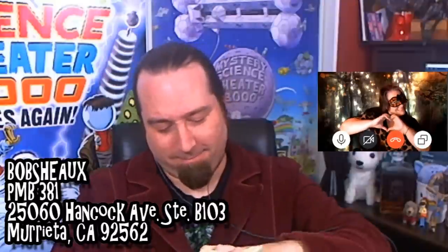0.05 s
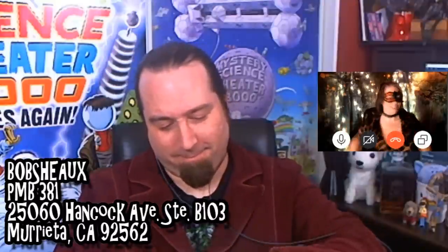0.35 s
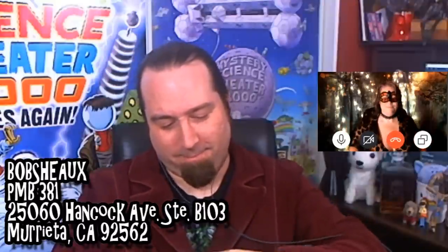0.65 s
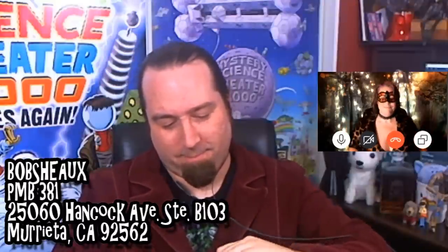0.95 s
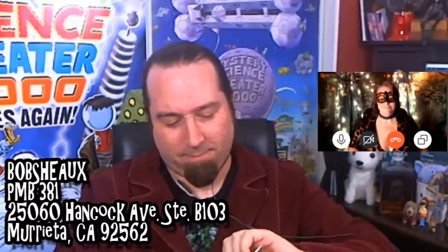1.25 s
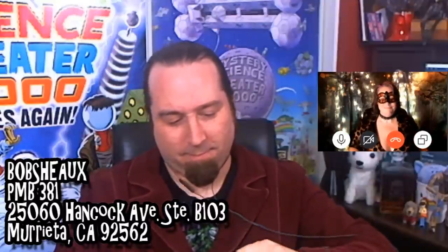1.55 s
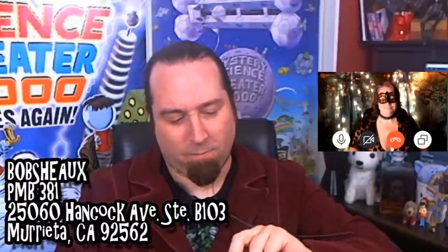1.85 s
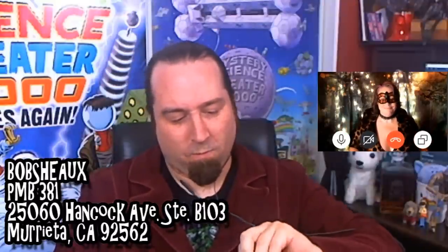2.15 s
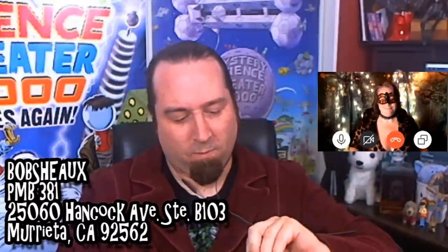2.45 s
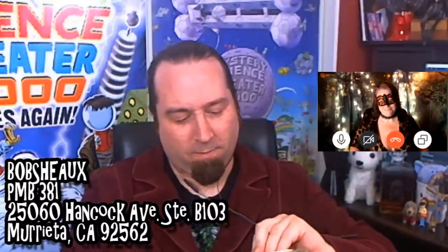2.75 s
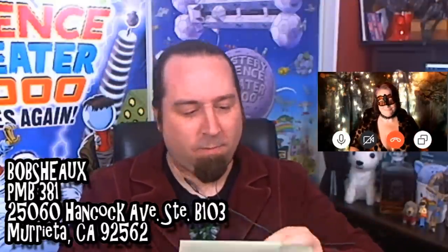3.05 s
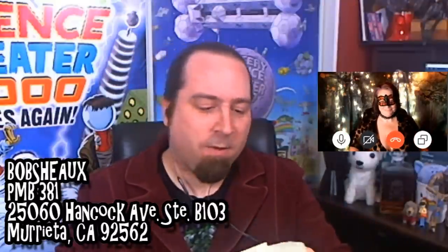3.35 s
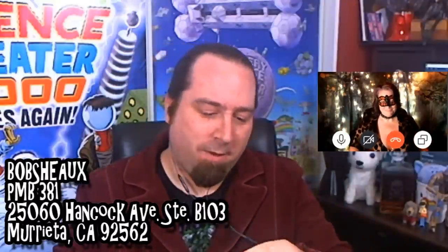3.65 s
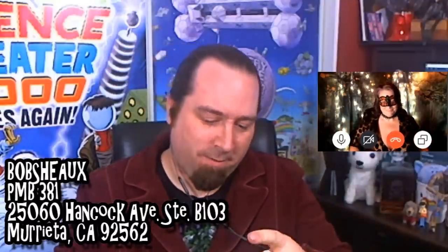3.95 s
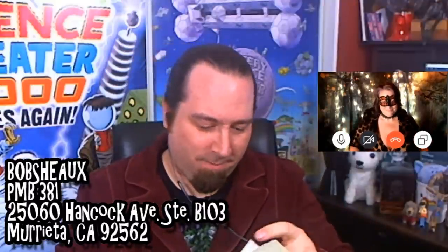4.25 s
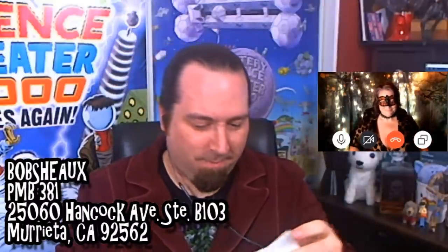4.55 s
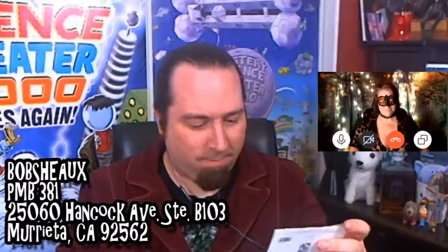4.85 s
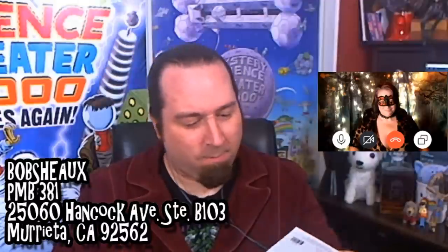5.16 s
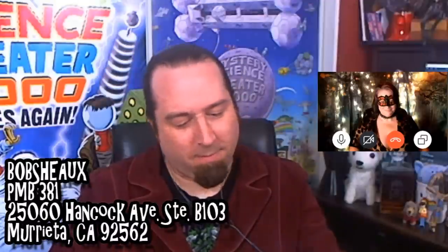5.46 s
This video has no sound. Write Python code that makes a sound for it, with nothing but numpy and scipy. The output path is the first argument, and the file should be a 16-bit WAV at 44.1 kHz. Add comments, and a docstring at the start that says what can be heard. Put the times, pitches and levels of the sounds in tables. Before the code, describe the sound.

A stiff paper envelope is handled close to the microphone in a small, dry room with a faint low rumble. In the first second, fingers stroke and push the paper, and its creases snap sharply at about 0.2 and 0.8 seconds. Just after 1 second the flap rips in a few short, hissing pulls, followed by a soft, dull bump on the desk. After a lull, another brief tear comes near 2.1 seconds. From about 2.7 seconds the paper crinkles and snaps in irregular bursts, with a quick rip around 3.5 seconds. From roughly 3 seconds a distant motor fades in very faintly and slowly speeds up. At about 4.5 seconds a sheet slides out with a hiss and a cluster of crisp snaps. A few light finger strokes and small ticks follow until the end, at around 5.7 seconds.

```python
"""A paper envelope is opened by hand at a desk, close up, in a small, dry room with a faint rumble.
First the fingers stroke and push the stiff paper, and its creases buckle in sharp snaps.
After a second the flap rips in short, hissing pulls; now and then the envelope bumps dully on the desk.
From about three seconds a distant motor drones in faintly and slowly speeds up.
Near the end a sheet slides out with more snaps, and a few light strokes follow."""
import sys
import numpy as np
from scipy import signal
from scipy.fft import rfft, irfft, next_fast_len
from scipy.io import wavfile
from scipy.ndimage import uniform_filter1d, map_coordinates

SR = 44100
rng = np.random.default_rng(int(sys.argv[2]) if len(sys.argv) > 2 else 0)


def master_out(mix):
    """Clip the mix to full scale and print it as 16-bit PCM to the path in sys.argv[1]."""
    frames = np.transpose(np.atleast_2d(mix))
    ceiling = np.clip(frames, -1, 1)
    pcm = np.round(ceiling * 32767).astype(np.int16)
    wavfile.write(sys.argv[1], SR, pcm)


N = 250929

# room tone, deep rumble to faint hiss: freq_hz, gain_db
ROOM_TONE_EQ = [(3, -13), (12, 0.5), (30, -24), (65, -20.5), (125, -20.5), (200, -23), (400, -29),
                (850, -30), (1500, -42), (3000, -43), (16000, -51)]
# how long the room rings: freq_hz, t60_s
ROOM_DECAY = [(150, .3), (500, 0.17), (2000, 0.13), (7000, 0.14), (11000, 0.087), (16000, 0.26)]
# the distant motor fades in and speeds up: time_s, firing_hz, level_db
MOTOR_RUN = [(2.7, 37, -82), (3.8, 39.3, -64), (4.85, 40, -60), (5.35, 41.1, -61), (5.69, 42, -61)]
# overtones of its firing rate: multiple, gain_db
MOTOR_OVERTONES = [(3, -8), (5, -6), (6, -2), (7, -7), (8, -3), (9, -1), (10, -4), (11, 2), (12, -4),
                   (13, -3), (16, -5)]
# the dull wash around them: freq_hz, gain_db
MOTOR_WASH_EQ = [(40, -11), (100, -7.5), (420, 4.5), (700, 4), (1500, -33), (5000, -34)]
# finger strokes over the paper: start_s, length_s, flex_db, hiss_db
STROKES = [(0, .006, -41.5, -51), (0.08, 0.072, -61.5, -63.5), (0.245, 0.14, -43, -48.5),
           (0.44, .11, -45.5, -52), (0.61, 0.036, -46.5, -48.5), (0.665, .035, -39, -42),
           (0.742, 0.062, -31.5, -38.5), (0.88, 0.053, -38, -39), (0.96, 0.055, -53.5, -55.5),
           (1.29, 0.1, -59.5, -55), (1.68, .03, -60, -62), (1.74, 0.12, -54.5, -59),
           (1.88, .045, -46.5, -50.5), (2.02, .04, -50, -55.5), (2.075, 0.027, -46, -44),
           (2.68, 0.0605, -55, -62), (2.865, 0.053, -53, -55.5), (2.93, .08, -44, -50.5),
           (3.135, 0.066, -53, -54), (3.27, .11, -48.5, -47), (3.435, 0.053, -44, -43.5),
           (3.65, 0.11, -54, -53), (3.78, 0.049, -53, -62.5), (3.89, 0.073, -62, -57.5),
           (3.965, .12, -54, -57), (4.25, 0.071, -51, -56.5), (4.4, .05, -54.5, -59),
           (4.485, .025, -43, -43), (4.68, 0.07, -46.5, -48), (4.79, 0.096, -53.5, -46),
           (4.94, 0.084, -70.5, -68), (5.1, 0.0072, -54.5, -45), (5.185, .05, -50, -48.5),
           (5.27, 0.067, -60, -58), (5.35, .11, -61.5, -52.5), (5.49, 0.066, -65, -65)]
# short pulls that rip the flap or slide the sheet: start_s, length_s, flex_db, hiss_db
PULLS = [(1.075, 0.034, -30, -35), (1.098, 0.046, -31.5, -28), (1.168, 0.024, -32, -27.5),
         (1.21, .015, -41, -36), (1.243, 0.016, -37, -34.5), (2.108, 0.03, -41.5, -37),
         (2.141, 0.011, -30.5, -37.5), (3.527, 0.022, -32, -30.5), (3.565, 0.023, -27, -38.5),
         (4.505, 0.059, -33.5, -35), (4.555, .06, -35, -30.5), (4.63, 0.034, -26.5, -43)]
# sharp paper snaps and a few dull bumps of the envelope on the desk:
# start_s, level_db, treble_corner_hz, decay_s (to fall 30 dB)
SNAPS_AND_BUMPS = [(0.171, -51, 1990, 0.024), (0.194, -31.5, 1600, 0.04), (0.2096, -17.5, 8300, .031),
                   (0.2756, -30, 1800, .035), (0.2922, -28.5, 1890, 0.038), (0.363, -46, 6100, 0.0054),
                   (0.416, -27.5, 3100, 0.02), (0.483, -36.5, 1967, 0.024), (0.502, -36, 1290, 0.022),
                   (0.52, -42, 13940, 0.011), (0.759, -16, 14000, .029), (0.77, -23.5, 11070, .053),
                   (0.787, -21, 7820, 0.015), (1.042, -42.5, 14200, 0.0094), (1.0492, -37.5, 5900, .014),
                   (1.0696, -30.5, 10000, .018), (1.258, -37, 614, 0.017), (1.287, -40.5, 900, 0.03),
                   (1.3552, -34, 1890, .02), (1.448, -52.5, 16000, .012), (1.609, -61.5, 6000, .013),
                   (1.891, -42, 7050, 0.046), (1.944, -48.5, 12000, 0.0059), (2.114, -32.5, 14800, 0.024),
                   (2.141, -30, 12040, .03), (2.316, -49.5, 11100, 0.017), (2.376, -57, 1810, 0.012),
                   (2.562, -57, 16000, 0.011), (2.608, -54.5, 16000, 0.011), (2.6596, -30.5, 3750, 0.02),
                   (2.6753, -21.5, 4730, .017), (2.775, -41.5, 8700, .011), (2.887, -42.5, 2900, 0.015),
                   (2.9118, -29.5, 4070, 0.014), (2.96, -24, 2700, 0.027), (3.039, -31, 1590, .036),
                   (3.073, -31.5, 1830, 0.024), (3.194, -40, 1900, 0.021), (3.2835, -28, 1900, 0.0068),
                   (3.2916, -27, 1830, 0.014), (3.304, -27, 16000, 0.004), (3.3039, -18, 2900, .014),
                   (3.44, -31.5, 11840, 0.0041), (3.4495, -27, 11000, 0.0037), (3.464, -43, 16150, 0.0083),
                   (3.534, -25.5, 16060, 0.012), (3.575, -23.5, 2300, 0.024), (3.588, -21.5, 2000, 0.024),
                   (3.63, -35, 2320, 0.036), (3.671, -35, 2780, 0.0187), (3.728, -39.5, 1670, 0.02),
                   (3.873, -49.5, 3000, 0.025), (3.946, -46, 3000, 0.034), (4.188, -43, 790, 0.042),
                   (4.272, -28.5, 1980, 0.0068), (4.278, -27.5, 4600, 0.057), (4.352, -50, 3000, .006),
                   (4.488, -33, 1700, 0.022), (4.621, -25, 987, 0.011), (4.624, -17, 3560, 0.022),
                   (4.64, -20.5, 2440, 0.038), (4.656, -22, 2550, 0.019), (5.006, -53.5, 16000, .007),
                   (5.091, -37, 15950, .008), (5.225, -43.5, 4950, 0.011)]
# hiss of skin on paper: freq_hz, gain_db
SKIN_EQ = [(500, -30.5), (1600, -20.5), (2300, 2.5), (3700, 4), (5500, 5.5), (7700, 3), (10000, -5),
           (12500, -2.5), (16000, -12.5)]
# body of the flexing sheet: freq_hz, gain_db
SHEET_EQ = [(40, -14), (180, -11), (400, -2), (590, -9), (780, 1), (970, -3.5), (1400, 1.5), (2000, -4.5),
            (2400, -4.5), (3200, -5.5), (6000, -34.5), (16000, -63)]
# hiss of parting fibres: freq_hz, gain_db
FIBRE_EQ = [(500, -31.5), (1900, -23.5), (3500, 3), (5500, 6), (7700, 6), (10000, -1.5), (12500, 0.5),
            (16000, -7.5)]
# tone of the stiff paper in a snap or bump: freq_hz, gain_db
PAPER_EQ = [(40, -22), (180, -17), (330, -0.5), (430, -1.5), (600, -5), (950, -3.5), (1500, -2.5),
            (2300, -3), (4300, -3.5), (7500, -4), (10000, -10.5), (12500, -9), (16000, -14)]
# added once the flap is torn, as loose paper rings a little higher: freq_hz, gain_db
LOOSE_PAPER_EQ = [(380, 0.5), (700, -2.5), (1400, -1), (2200, 1.5), (3500, -0.5)]

FLAP_TORN_S = 1.5
HOLDING_DB = -73.5  # the paper never lies quite still in the hands
TOP_HZ = 16000


def amp(db):
    """Decibels as a linear gain."""
    return 10 ** (np.asarray(db) / 20)


def unit(x):
    """x scaled to rms 1."""
    return x / np.sqrt(np.mean(x ** 2) + 1e-20)


def along(points, hz):
    """Read a curve of (freq_hz, value) points on a log frequency axis."""
    freqs, values = np.transpose(points)
    return np.interp(np.log(hz + 1), np.log(freqs + 1), values)


def wobble(rate):
    """A smooth random curve, rate knots a second."""
    return map_coordinates(rng.standard_normal(int(N * rate / SR) + 4), [np.arange(N) * rate / SR])


def ring(x, gain_db, size=2048):
    """x through a minimum-phase body whose response is gain_db(hz)."""
    cepstrum = irfft(np.log(amp(gain_db(np.fft.rfftfreq(size, 1 / SR))) + 1e-6))
    cepstrum[1:size // 2] *= 2
    cepstrum[size // 2 + 1:] = 0
    return signal.fftconvolve(x, irfft(np.exp(rfft(cepstrum))))[:len(x)]


def coloured(x, eq):
    """x through an EQ curve, at rms 1."""
    return unit(ring(x, lambda hz: along(eq, hz)))


def grains(count, per_s, spread_db):
    """Tiny slips at random moments, a few much larger than the rest; rms 1."""
    sizes = amp(spread_db * np.minimum(rng.exponential(size=count), 4)) * rng.choice([-1, 1], count)
    return unit(sizes * (rng.random(count) < per_s / SR))


def room_tone(level_db=-57, swell_db=0.5):
    """The quiet room: a deep, uneven rumble under a faint hiss."""
    hz = np.fft.rfftfreq(N, 1 / SR)
    air = unit(irfft(rfft(rng.standard_normal(N)) * amp(along(ROOM_TONE_EQ, hz)), N))
    return amp(level_db + swell_db * wobble(2.944)) * air


def room_reverb(x, tail_db=-9, build_s=0.0042, block=12000):
    """Desk and walls add a short diffuse tail, new for each block, as if the hands had moved."""
    out = np.pad(x, (0, SR))
    for start in range(0, N, block):
        hz, t, noise = signal.stft(rng.standard_normal(SR // 3), SR, nperseg=256)
        decay = amp(-60 * t / along(ROOM_DECAY, hz)[:, None])
        tail = signal.istft(noise * decay, SR, nperseg=256)[1]
        tail *= 1 - np.exp(-np.arange(len(tail)) / SR / build_s)
        echo = signal.fftconvolve(x[start:start + block], amp(tail_db) * tail / np.linalg.norm(tail))
        out[start:start + len(echo)] += echo
    return out[:N]


def distant_motor(drone_db=-2, wash_db=-3, drift_hz=0.05, waver_db=3.3):
    """Wavering overtones of the firing rate in a dull wash, heard through the walls."""
    t = np.arange(N) / SR
    times, rates, levels = np.transpose(MOTOR_RUN)
    firing_hz = np.interp(t, times, rates) + drift_hz * wobble(8)
    phase = 2 * np.pi * np.cumsum(firing_hz) / SR
    drone = sum(amp(db + waver_db * wobble(5.8)) * np.sin(multiple * phase + 2 * np.pi * rng.random())
                for multiple, db in MOTOR_OVERTONES)
    wash = coloured(rng.standard_normal(N), MOTOR_WASH_EQ)
    return amp(np.interp(t, times, levels)) * (amp(drone_db) * unit(drone) + amp(wash_db) * wash)


def bending(x, depth_db):
    """The resonances of the sheet wander as it bends."""
    spectra = signal.stft(x, nperseg=512)[2]
    patches = uniform_filter1d(rng.standard_normal(spectra.shape), size=4, axis=0)  # across frequency
    patches = uniform_filter1d(patches, size=12, axis=1)  # across time
    return signal.istft(spectra * amp(depth_db * unit(patches)), nperseg=512)[1][:N]


def hand_moves(moves, attack_s, swell_db, release_s):
    """Gains of flex and hiss: each move takes hold, swells or eases by swell_db, and lets go."""
    t, gains = np.arange(N) / SR, np.zeros((2, N))
    for start_s, length_s, flex_db, hiss_db in moves:
        age = t - start_s
        fades = np.exp(np.minimum(age, 0) / attack_s - np.maximum(age - length_s, 0) / release_s)
        swell = amp(swell_db * (np.clip(age / length_s, 0, 1) - 1))
        gains = np.maximum(gains, amp([[flex_db], [hiss_db]]) * fades * swell)
    return gains


def finger_strokes(trim_db=-1, jerk_db=3.0):
    """Skin slides on paper: a fine friction hiss with scattered ticks, over the flexing sheet."""
    gains = hand_moves(STROKES, attack_s=0.021, swell_db=-1.5, release_s=0.022)
    flex, hiss = np.hypot(gains, amp(HOLDING_DB))
    ticks = 0.35 * grains(N, per_s=90, spread_db=2.5)
    friction = grains(N, per_s=14000, spread_db=3.5)
    slips = bending(friction + ticks, depth_db=0.5) * amp(jerk_db * wobble(67))
    return amp(trim_db) * (flex * coloured(slips, SHEET_EQ) + hiss * coloured(slips, SKIN_EQ))


def paper_rips(trim_db=-1, jerk_db=1.1):
    """Fibres part in a dense, slightly jerky stream that hisses and shakes the sheet."""
    flex, hiss = hand_moves(PULLS, attack_s=0.011, swell_db=0.5, release_s=0.011)
    breaks = grains(N, per_s=16000, spread_db=2.5)
    tear = bending(breaks, depth_db=3.1) * amp(jerk_db * wobble(120))
    return amp(trim_db) * (flex * coloured(tear, SHEET_EQ) + hiss * coloured(tear, FIBRE_EQ))


def hit_tone(hz, level_db, corner_hz, torn, body_hz=400, width_hz=240):
    """EQ of one snap or bump in dB: gentle ones get more low body, firm ones less."""
    paper_db = along(PAPER_EQ, hz) + torn * along(LOOSE_PAPER_EQ, hz)
    body_db = (-3 - 0.24 * (level_db + 30)) / (1 + ((hz - body_hz) / width_hz) ** 2) ** 2
    rolloff_db = 10 * np.log10(1 + (hz / corner_hz) ** 3.89)
    return paper_db + body_db - rolloff_db


def snaps_and_bumps(crack_gain=0.79, crack_t60_s=0.0031, rise_share=0.042):
    """A crease gives way with one crack and a dying crackle; the same shape, dulled, makes a desk bump."""
    out, t = np.zeros(N + SR), np.arange(SR // 5) / SR
    for start_s, level_db, corner_hz, decay_s in SNAPS_AND_BUMPS:
        crack = rng.standard_normal(len(t)) * amp(-60 * t / crack_t60_s)
        rise = 1 - np.exp(-t / (rise_share * decay_s))
        crackle = grains(len(t), per_s=5000, spread_db=3.5) * amp(-30 * t / decay_s) * rise
        # short, bright hits carry more crack; long, dull ones are mostly crackle
        sharpness = np.sqrt(corner_hz / 8000 * 0.018 / decay_s)
        burst = crack_gain * sharpness * unit(crack) + unit(crackle)
        hit = ring(burst, lambda hz: hit_tone(hz, level_db, corner_hz, torn=start_s > FLAP_TORN_S))
        hit *= np.sqrt(SR / 100 / np.sum(hit ** 2))  # the energy of 10 ms at rms 1
        out[int(start_s * SR):][:len(t)] += amp(level_db) * hit
    return out[:N]


def scene():
    """Close paper in its room, over room tone and motor; the same in both channels."""
    paper = snaps_and_bumps() + paper_rips() + finger_strokes()
    mono = room_reverb(paper) + room_tone() + distant_motor()
    return np.array([mono, mono])


def record(dry):
    """Clip at full scale and cut everything above TOP_HZ."""
    size = next_fast_len(N + SR // 2)
    passband = np.fft.rfftfreq(size, 1 / SR) < TOP_HZ
    return irfft(rfft(np.clip(dry, -1, 1), size) * passband, size)[:, :N]


dry = scene()
out = record(dry)
master_out(out)
```